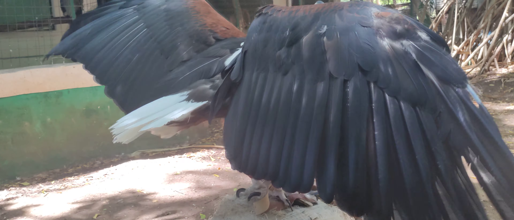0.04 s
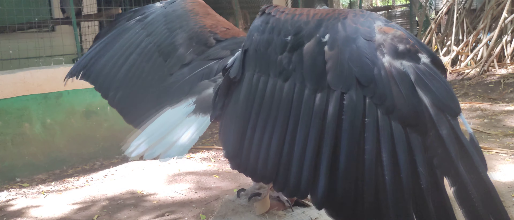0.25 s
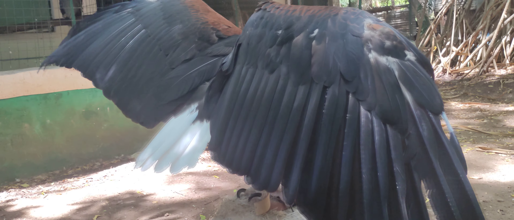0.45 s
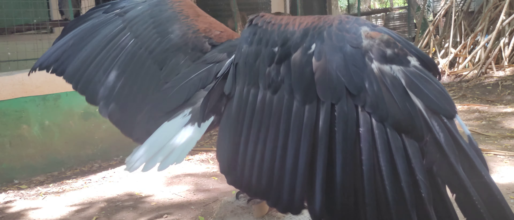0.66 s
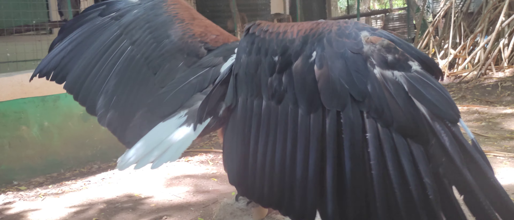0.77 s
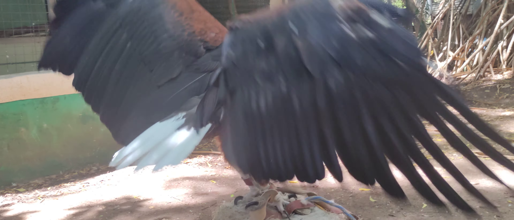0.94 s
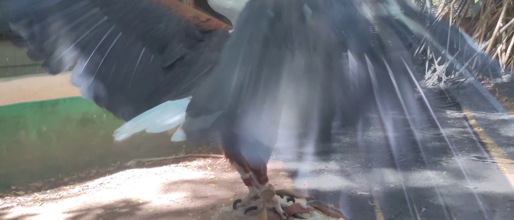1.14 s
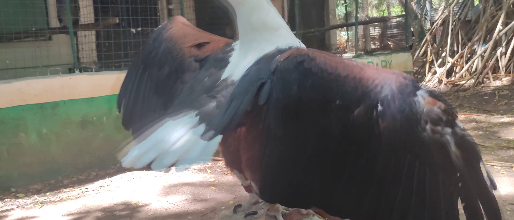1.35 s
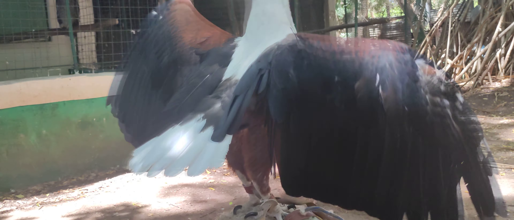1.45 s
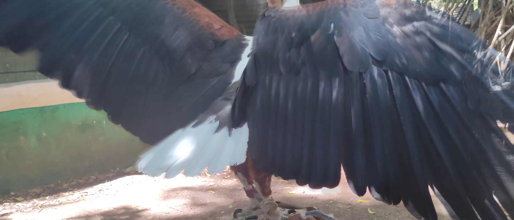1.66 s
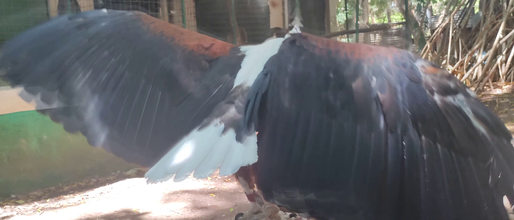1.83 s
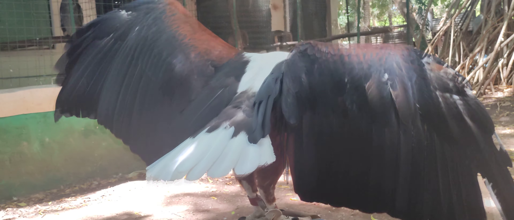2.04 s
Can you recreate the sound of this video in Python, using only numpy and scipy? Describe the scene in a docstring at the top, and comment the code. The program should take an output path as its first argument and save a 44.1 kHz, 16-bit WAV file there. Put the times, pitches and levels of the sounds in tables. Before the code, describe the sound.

A large eagle calls close by in a walled yard. Faint wind and air open; at 0.25 s a rising whistle breaks with a soft knock into a long cry until 0.67. Breathy hiss swells around 0.8-0.95 with a faint wheeze. A harsh scream at 1.05, squeak and squeal at 1.2, breaking whistle at 1.25, loud yelp at 1.45-1.6, softer yelp at 1.75-1.85; soft grunts between, short echoes.

```python
"""A walled yard, two microphones: an eagle's rising whistle breaks into a long cry with a soft knock.
A louder breathy hiss and a faint wheeze follow, then a harsh scream with a low puff in it, a squeak with
a thin squeal, a high whistle that breaks, and two lower yelps; soft grunts fall between the calls.
Calls are partials on an unsteady pitch; hiss, sputter, knock, puff, wind and still air are coloured noise.
Near walls, far wall and a diffuse tail are noise responses; a limiter and soft ceiling end the chain."""
import sys
import numpy as np
from scipy import signal
from scipy.fft import rfft, irfft
from scipy.io import wavfile
from scipy.ndimage import uniform_filter1d

SR = 44100
rng = np.random.default_rng(int(sys.argv[2]) if len(sys.argv) > 2 else 0)


def generate_wav(sig):
    """Save sig (samples, or channels by samples) to the path in sys.argv[1] as 16-bit PCM at SR."""
    pcm = np.round(np.clip(np.atleast_2d(sig).T, -1, 1) * 32767).astype(np.int16)
    wavfile.write(sys.argv[1], SR, pcm)


N = 92610  # samples: 2.1 s

# Levels in the tables are those ahead of the walls, the left-right balance and the limiter.
# Calls of the bird:
# (time [s], pitch [Hz], fundamental level [dB], octave level [dB], third partial and up level [dB])
RISING_WHISTLE = [(.245, 911.5, -18, -45.5, -60.5), (.265, 1014, -15, -43, -73), (.283, 1123, -9, -62, -30),
                  (.308, 1166, -13.5, -45, -32), (.332, 1250, -12, -41, -29.5)]
LONG_CRY = [(.343, 1011, -15.5, -34, -46), (.45, 1018, -16, -28, -37), (.55, 991.8, -14, -28.5, -45.5),
            (.62, 956.6, -17.5, -33.5, -41), (.648, 928, -20, -30, -39), (.671, 790, -32, -31.5, -52)]
SCREAM = [(1.042, 1092, -16, -22, -30), (1.056, 1135, -10, -27, -14), (1.073, 1153, -16.5, -19, -24.5),
          (1.094, 1117, -13.5, -19.5, -17), (1.11, 1073, -17, -15, -19), (1.135, 1005, -18.5, -23, -25),
          (1.153, 993, -21.5, -30.5, -45)]
SQUEAK = [(1.171, 1329, -29.5, -52.5, -47), (1.181, 1240, -13.5, -51, -60),
          (1.192, 1112, -25.5, -42.5, -34)]
HIGH_WHISTLE = [(1.222, 1113, -19.5, -58.5, -67), (1.241, 1169, -3, -64, -30.5),
                (1.266, 1133, -6, -41.5, -24.5), (1.286, 1070, -11.5, -48.5, -73.5)]
BREAK = [(1.292, 833, -29.5, -55, -66), (1.302, 763.5, -19, -25.5, -45), (1.314, 671, -37, -62.5, -64)]
LOUD_YELP = [(1.448, 772.8, -17.5, -18.5, -41), (1.512, 819.2, -13.5, -20.5, -47),
             (1.574, 775.6, -11.5, -18.5, -39), (1.598, 730.3, -23.5, -29, -50)]
SOFT_YELP = [(1.761, 820, -21, -37, -54.5), (1.812, 810, -16, -35.5, -49), (1.852, 772.7, -24, -37.5, -58)]
# Overtone patterns of the calls, 4th partial upward: (level against the 3rd [dB])
WHISTLE_TONE = [-6.5, -10, -6.5, -13.5, -15, -18]
CRY_TONE = [-23.5, -3.5, -5, -16.5, -18, -26.5]
SCREAM_TONE = [-13.5, -17.5, -16.5, -20.5, -28.5]
YELP_TONE = [-19.5, -7.5, -8, -10.5, -9, -13]
# The beak rings on one overtone as a long call ends:
# (time [s], width [s], frequency [Hz], lift [dB])
BEAK_RINGS = [(0.627, 0.07, 5090, 10), (1.578, .022, 3900, 8)]
BEAK_WIDTH_HZ = 460
ATTACK_S, RELEASE_S = 0.015, 0.013  # fades lie outside a note's first and last times
JITTER_HZ, FLUTTER_HZ = 274, 172  # bandwidths of the pitch and level unsteadiness
# Voice balance, left against right: (frequency [Hz], level [dB])
VOICE_BALANCE = [(900, -0.5), (2200, -4.5), (3400, -8), (9000, -7)]
RIGHT_DELAY_S = .00006  # the right microphone is reached later
# Second side of the syrinx, a thin falling whistle: (time [s], pitch [Hz], level [dB])
SECOND_VOICE = [(.295, 2457, -43), (.39, 2411, -33), (.45, 2211, -38), (.5, 1834, -46)]
# Faint wheeze as the bird draws air: (time [s], pitch [Hz], level [dB])
WHEEZE = [(.88, 855, -53.5), (.95, 587, -50), (.99, 446, -59.5)]
# Thin high squeal: (time [s], pitch [Hz], level [dB])
SQUEAL = [(1.201, 4970, -40), (1.209, 4860, -25), (1.215, 4630, -35)]
# Soft grunts: (start time [s], length [s], first pitch [Hz], last pitch [Hz], level [dB])
GRUNTS = [(1.014, 0.026, 385, 469, -48), (1.346, 0.049, 433, 422, -48), (1.643, 0.034, 400, 375, -47.5)]
# Partials of a grunt, fundamental upward: (relative level [dB])
GRUNT_TONE = [0, -5, -0.85]
# Breathy hiss between calls: (time [s], level [dB])
HISS = [(0, -53), (.25, -47.5), (.62, -51.5), (.78, -38), (.89, -35.5), (1.02, -45.5), (1.4, -51.5),
        (1.66, -48), (1.85, -46.5), (2.1, -60)]
# Spectrum of the hiss: (frequency [Hz], relative level [dB])
HISS_COLOUR = [(400, -27), (1150, -6.5), (1480, -0.5), (1850, 1.5), (2700, -14), (4000, -15), (6000, -12),
               (8600, -21), (11000, -56.5)]
# Short sputtering noise: at the whistle's break, with the squeal amid the scream's echo,
# and at the yelp's onset: (time [s], width [s], level [dB])
SPUTTERS = [(.335, 0.0089, -38.5), (1.207, 0.015, -30.5), (1.445, 0.0042, -43.5)]
# Spectrum of the sputtering noise: (frequency [Hz], relative level [dB])
SPUTTER_COLOUR = [(500, -23), (1700, -40), (2150, 10), (2700, -19), (3250, -2), (4000, -3), (5200, -4),
                  (15000, -22.5)]
# A soft knock as the whistle breaks, and a low puff in the scream: (time [s], width [s], level [dB])
KNOCK_AND_PUFF = [(.336, 0.008, -38), (1.098, 0.025, -45.5)]
# Spectrum of the knock and puff: (frequency [Hz], relative level [dB])
KNOCK_COLOUR = [(50, -9), (200, -24.5), (750, -35), (3000, -60)]
# The overload adds a whistle's overtones, so the walls get mostly its fundamental:
# (frequency [Hz], gain [dB])
WHISTLE_TO_WALLS = [(1400, 0), (3000, -10)]
# Gain of the near walls: (frequency [Hz], gain [dB])
NEAR_COLOUR = [(1000, -11), (4000, -2.5)]
NEAR_DECAY_S = 0.016
# Gain of the far wall: (frequency [Hz], gain [dB])
FAR_COLOUR = [(900, -26), (2200, -13), (3400, -16)]
FAR_S, FAR_SPREAD_S = 0.04, 0.022  # the far wall answers in a short cluster
# Decay of the yard by 60 dB: (frequency [Hz], time [s])
YARD_T60 = [(1000, 0.52), (3000, 0.55), (14000, 0.29)]
# Gain of the yard's tail: (frequency [Hz], gain [dB])
YARD_COLOUR = [(800, -23), (2000, -18), (4000, -15)]
# Wind on the microphone: (time [s], level [dB])
WIND = [(.12, -50), (.35, -59), (.95, -55.5), (1.35, -55), (1.8, -52.5)]
# Spectrum of the wind: (frequency [Hz], relative level [dB])
WIND_COLOUR = [(20, -23), (95, 0), (160, -4.5), (260, -17), (2000, -41)]
# Spectrum of the yard's still air: (frequency [Hz], relative level [dB])
AIR_COLOUR = [(90, -21), (350, -17.5), (1100, -17), (1600, -11.5), (2550, -44.5), (6500, -24),
              (11000, -51.5)]
AIR_DB = -56.5
WIND_SAME, HISS_SAME = 0.82, 0.043  # likeness of the two channels, 1 = identical
# A narrow dip in the microphone's response: (frequency [Hz], gain [dB])
MIC_DIP = [(2450, -0.5), (2680, -2.5), (2900, -0.5)]
LIMIT_DB, RECOVER_DB_PER_S = -12.5, 144
CEILING = 0.51  # the input saturates here, of full scale
EDGE_HZ = 15500  # upper band limit


def call(rows, tone, jitter, flutter, roll_off_db, hollow=False, count=9):
    """One call: patterned overtones, then partials losing roll_off_db each; hollow ties even ones to the octave."""
    times, pitches = np.transpose(rows)[:2]
    pitch = glide(times, pitches)
    first, octave, upper = over_time(rows)[1:]
    fading = [tone[-1] - roll_off_db * k for k in range(1, count)]
    partials_db = [first, octave]
    for k, db in enumerate([0] + list(tone) + fading, 3):
        base = octave if hollow and k % 2 == 0 else upper
        partials_db.append(base + db + beak(k * pitch))
    return syrinx(times[0], times[-1], pitch, partials_db, jitter, flutter)


def syrinx(start, end, hz, partials_db, jitter, flutter):
    """A vibrating membrane: partials on one unsteady pitch, the higher ones leaning to the right."""
    t = np.arange(N) / SR
    rise = (t - start) / ATTACK_S + 1
    fall = (end - t) / RELEASE_S + 1
    gate = np.clip(np.minimum(rise, fall), 0, 1)
    on = gate > 0
    pitch = (hz * (1 + jitter * wobble(JITTER_HZ)))[on]
    cycles = np.cumsum(pitch) / SR - np.outer([0, RIGHT_DELAY_S], pitch)
    phase = 2 * np.pi * cycles
    out = np.zeros((2, N))
    for k, db in enumerate(partials_db, 1):
        lean = amp(np.outer([.5, -.5], at_hz(VOICE_BALANCE, k * pitch)))
        level = lean / lean.mean(0) * amp(db[on])
        audible = k * pitch < SR / 2
        out[:, on] += level * np.sqrt(2) * np.cos(k * phase) * audible
    return out * np.sin(np.pi / 2 * gate) ** 2 * (1 + flutter * wobble(FLUTTER_HZ))


def beak(hz):
    """Lift in dB of a partial that meets the beak's resonance late in a call."""
    t = np.arange(N) / SR
    lift = 0
    for s, width, ring_hz, db in BEAK_RINGS:
        off_time, off_pitch = (t - s) / width, (hz - ring_hz) / BEAK_WIDTH_HZ
        lift = lift + db * np.exp(-.5 * (off_time ** 2 + off_pitch ** 2))
    return lift


def thin_whistle(rows, jitter, flutter):
    """A thin tone: one lone gliding partial."""
    times, pitches = np.transpose(rows)[:2]
    return syrinx(times[0], times[-1], glide(times, pitches), over_time(rows)[1:], jitter, flutter)


def grunts(jitter, flutter):
    """Low, weak notes of the syrinx between the calls, with few partials."""
    out = np.zeros((2, N))
    for start, length, from_hz, to_hz, level_db in GRUNTS:
        end = start + length
        hz, db = over_time([(start, from_hz, level_db), (end, to_hz, level_db)])
        out += syrinx(start, end, hz, [db + d for d in GRUNT_TONE], jitter, flutter)
    return out


def hiss(right_db, coarse_db, sputter_hz):
    """Air rushing through the open beak, and short bursts of noise whose level sputters."""
    breathy = noise(HISS_COLOUR, HISS_SAME) * amp(over_time(HISS)[0])
    unsteady = unit(amp(coarse_db * wobble(sputter_hz)))
    sputters = noise(SPUTTER_COLOUR, HISS_SAME) * unsteady * swells(SPUTTERS)
    return (breathy + sputters) * amp([[-right_db], [right_db]])


def knock_and_puff():
    """Low knock and puff: short bursts of noise."""
    return noise(KNOCK_COLOUR, WIND_SAME) * swells(KNOCK_AND_PUFF)


def near_walls(x):
    """A few quick, sparse reflections, different at each microphone."""
    t = np.arange(SR // 8) / SR
    size = (2, len(t))
    taps = rng.standard_normal(size) * (rng.random(size) < 900 / SR)  # about 900 a second
    return reflect(x, taps * np.exp(-t / NEAR_DECAY_S) * (t > .002), NEAR_COLOUR)


def far_wall(x):
    """One echo off the far wall, smeared into a bell-shaped cluster."""
    t = np.arange(SR // 8) / SR
    cluster = np.exp(-.5 * ((t - FAR_S) / FAR_SPREAD_S) ** 2)
    return reflect(x, rng.standard_normal((2, len(t))) * cluster, FAR_COLOUR)


def yard(x):
    """The diffuse tail of the yard, each band dying at its own speed."""
    hz, t, z = signal.stft(rng.standard_normal((2, SR)), SR, nperseg=256)
    decay = amp(-60 * t / at_hz(YARD_T60, hz)[:, None])
    tail = signal.istft(z * decay * (t > .012), SR, nperseg=256)[1]
    return reflect(x, tail, YARD_COLOUR)


def reflect(x, response, colour):
    """Sound thrown back: convolves with a response of energy 1 per channel, then coloured."""
    response = response / np.linalg.norm(response, axis=1, keepdims=True)
    return signal.fftconvolve(x, coloured(response, colour), axes=1)[:, :N]


def wind(lumpy_db, gust_hz):
    """Moving air rumbles on the microphone, its level lumpy."""
    level_db = over_time(WIND)[0] + lumpy_db * wobble(gust_hz)
    return noise(WIND_COLOUR, WIND_SAME) * amp(level_db)


def still_air():
    """The still air of the yard: steady, faint noise, nearly unalike in the two channels."""
    return amp(AIR_DB) * noise(AIR_COLOUR, HISS_SAME)


def noise(colour, same):
    """Two partly alike channels of coloured noise, rms 1."""
    a, b = rng.standard_normal((2, N))
    same = np.clip(same, -1, 1)
    right = same * a + np.sqrt(1 - same ** 2) * b
    return unit(coloured(np.array([a, right]), colour))


def wobble(rate_hz):
    """Random unsteadiness of rms 1, mostly below rate_hz."""
    hz = np.fft.rfftfreq(N, 1 / SR)
    return unit(irfft(rfft(rng.standard_normal(N)) / (1 + (hz / rate_hz) ** 4), N))


def swells(rows):
    """Bell-shaped level bumps as gains."""
    t = np.arange(N) / SR
    return sum(amp(db) * np.exp(-.5 * ((t - s) / width) ** 2) for s, width, db in rows)


def glide(s, values):
    """A smooth curve through the points, sample by sample, by cubic pieces with matched slopes."""
    s, values, t = np.array(s), np.array(values), np.arange(N) / SR
    slope = np.gradient(values, s, edge_order=2)
    place = np.interp(t, s, np.arange(len(s)))
    i = np.minimum(place.astype(int), len(s) - 2)
    u, step, span = place - i, np.diff(values)[i], np.diff(s)[i]
    leave = slope[i] * span - step
    arrive = slope[i + 1] * span - step
    return values[i] + u * step + u * (1 - u) * ((1 - u) * leave - u * arrive)


def over_time(rows):
    """Each column of a table after the time, in straight lines, sample by sample."""
    s, *columns = np.transpose(rows)
    return [np.interp(np.arange(N) / SR, s, c) for c in columns]


def coloured(x, colour):
    """Filters by a spectrum in dB."""
    size = x.shape[-1]
    gain = amp(at_hz(colour, np.fft.rfftfreq(size, 1 / SR)))
    return irfft(rfft(x) * gain, size)


def at_hz(points, hz):
    """Reads a spectrum on a log-frequency axis."""
    f, value = np.transpose(points)
    return np.interp(np.log(hz + 1), np.log(np.abs(f) + 1), value)


def unit(x):
    """Scales to rms 1."""
    return x / np.sqrt(np.mean(x ** 2) + 1e-20)


def amp(db):
    """Decibels to gain."""
    return 10 ** (np.asarray(db) / 20)


def scene():
    """The bird at the microphones, and its calls thrown at the walls, each kind at its own level."""
    whistles = sum(call(rows, WHISTLE_TONE, jitter=0.0071, flutter=0.05, roll_off_db=3.0, hollow=True)
                   for rows in (RISING_WHISTLE, SQUEAK, HIGH_WHISTLE))
    cry = call(LONG_CRY, CRY_TONE, jitter=0.00059, flutter=0.0065, roll_off_db=3.0)
    scream = call(SCREAM, SCREAM_TONE, jitter=0.004, flutter=0.05, roll_off_db=3.8)
    yelps = sum(call(rows, YELP_TONE, jitter=0.00083, flutter=0.0047, roll_off_db=3.5)
                for rows in (BREAK, LOUD_YELP, SOFT_YELP))
    second_voice = thin_whistle(SECOND_VOICE, jitter=0.0015, flutter=0.19)
    wheeze = thin_whistle(WHEEZE, jitter=0.055, flutter=0.78)
    squeal = thin_whistle(SQUEAL, jitter=0.0078, flutter=0.3)
    small = second_voice + wheeze + squeal + grunts(jitter=0.02, flutter=0.16)
    voiced = cry + scream + yelps + small
    to_walls = coloured(whistles, WHISTLE_TO_WALLS)
    thrown = to_walls + amp(7.5) * cry + amp(4.5) * scream + amp(-1.5) * yelps + small
    room = near_walls(voiced + to_walls) + far_wall(thrown) + yard(thrown)
    breath = hiss(right_db=2.0, coarse_db=3.5, sputter_hz=248)
    background = wind(lumpy_db=3.5, gust_hz=7.5) + still_air()
    return whistles + voiced + breath + knock_and_puff() + room + background


def record(dry):
    """A quick limiter holds the calls level and the tallest peaks saturate; then the band limit."""
    power = abs(uniform_filter1d((dry ** 2).mean(0), size=200))
    power_db = 10 * np.log10(power + 1e-12)
    # The held level jumps up with the sound and falls back at a steady rate
    fall = np.arange(N) * RECOVER_DB_PER_S / SR
    held_db = np.maximum.accumulate(power_db + fall) - fall
    over_db = np.maximum(held_db - LIMIT_DB, 0)
    limited = coloured(dry, MIC_DIP) / amp(uniform_filter1d(over_db, size=150))
    saturated = limited / (1 + (limited / CEILING) ** 8) ** (1 / 8)
    low_pass = signal.firwin(511, EDGE_HZ, window=("kaiser", 9), fs=SR)
    return signal.oaconvolve(saturated, low_pass[None], "same")


dry = scene()
out = record(dry)
generate_wav(out)
```